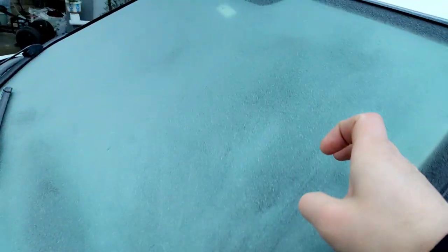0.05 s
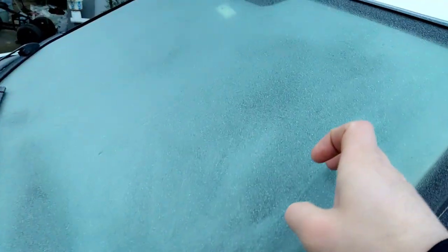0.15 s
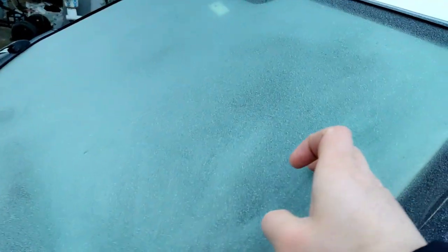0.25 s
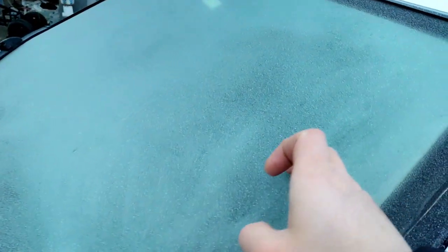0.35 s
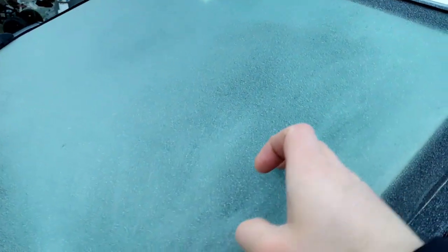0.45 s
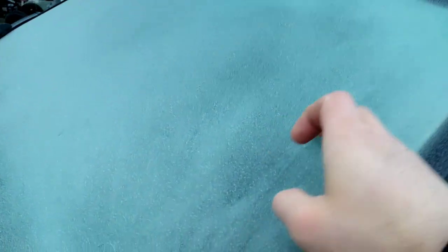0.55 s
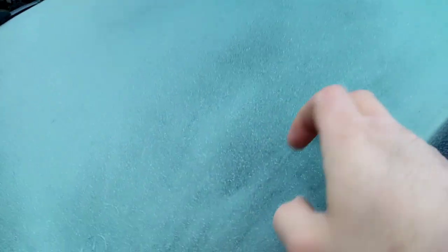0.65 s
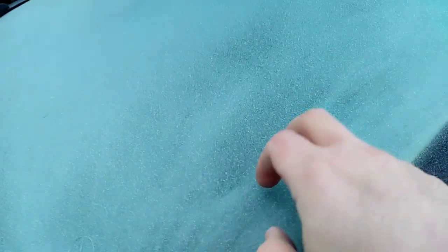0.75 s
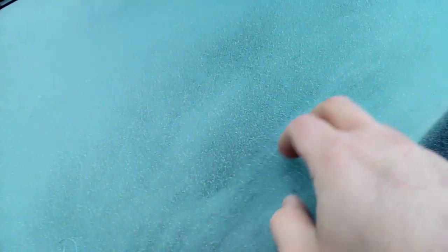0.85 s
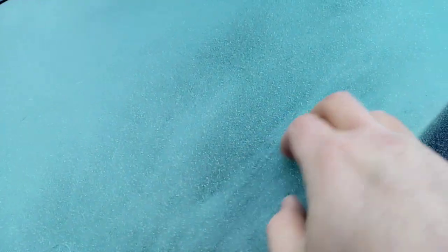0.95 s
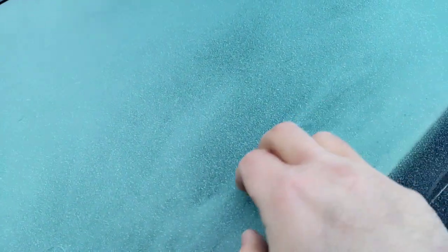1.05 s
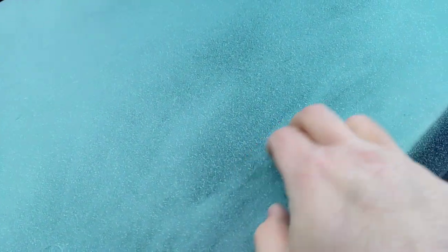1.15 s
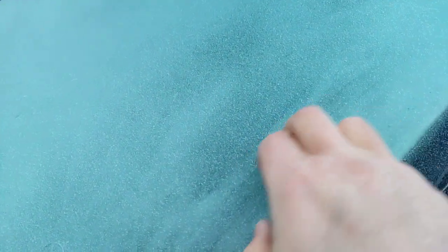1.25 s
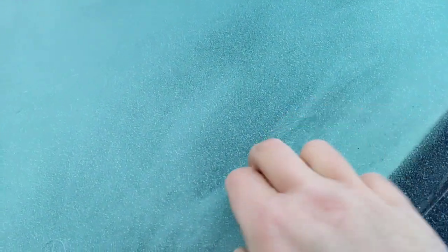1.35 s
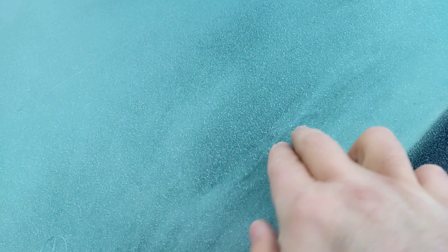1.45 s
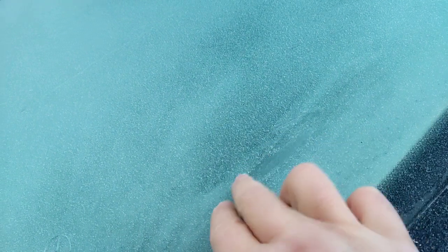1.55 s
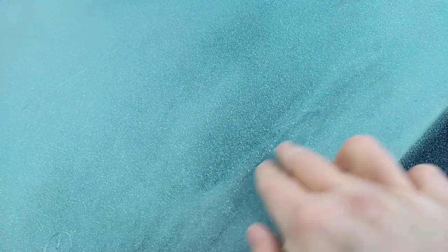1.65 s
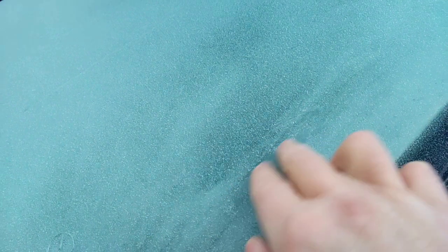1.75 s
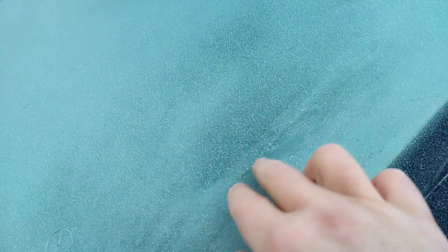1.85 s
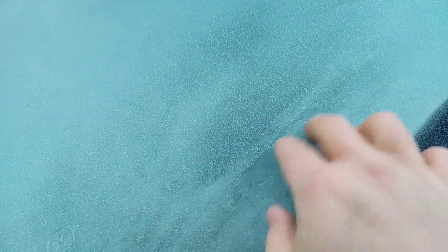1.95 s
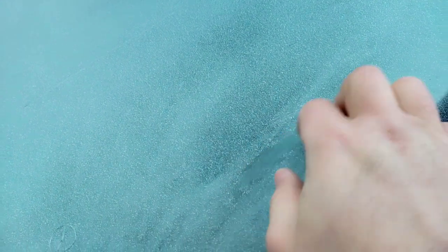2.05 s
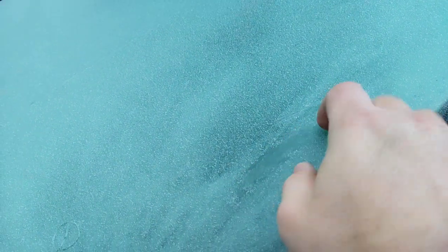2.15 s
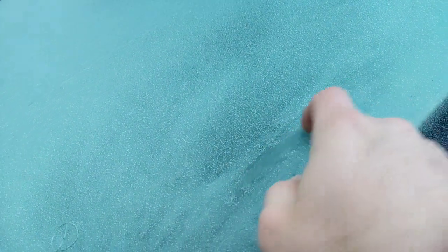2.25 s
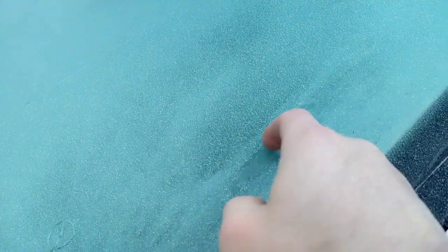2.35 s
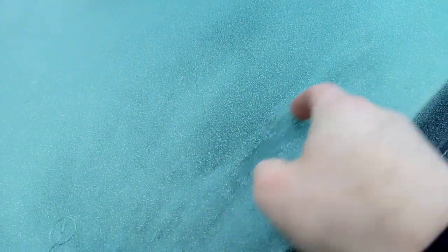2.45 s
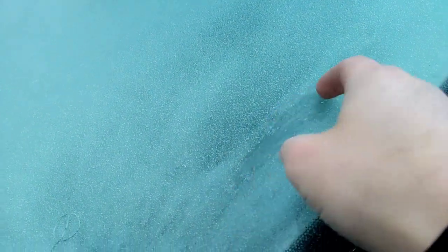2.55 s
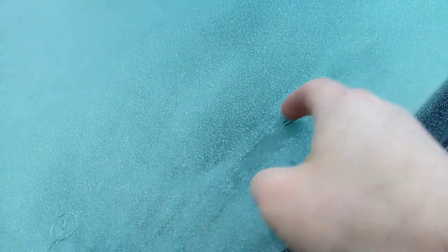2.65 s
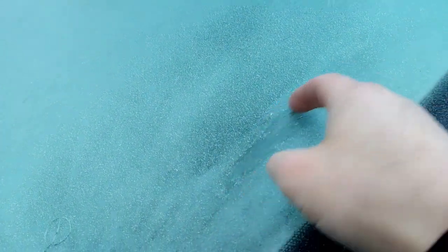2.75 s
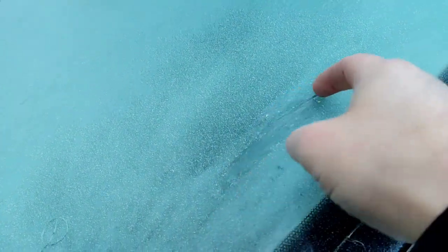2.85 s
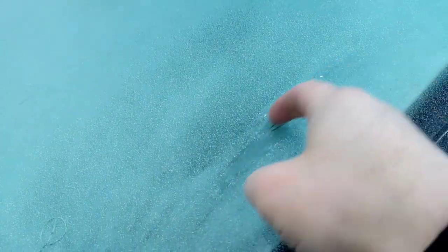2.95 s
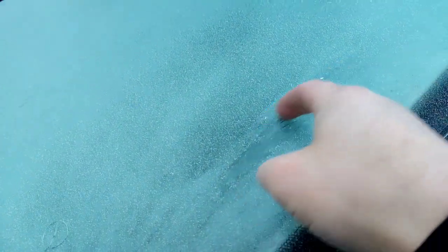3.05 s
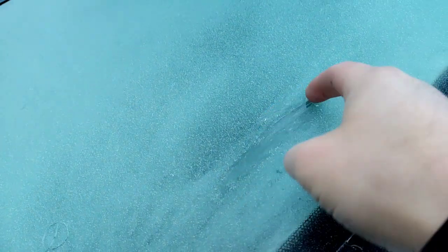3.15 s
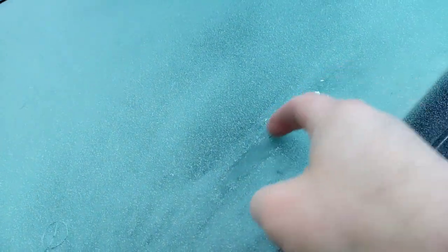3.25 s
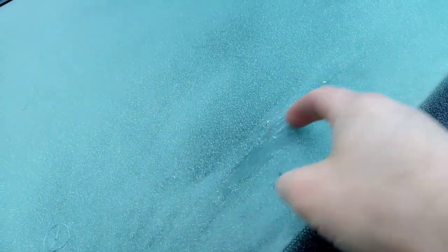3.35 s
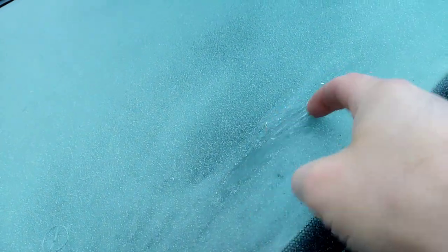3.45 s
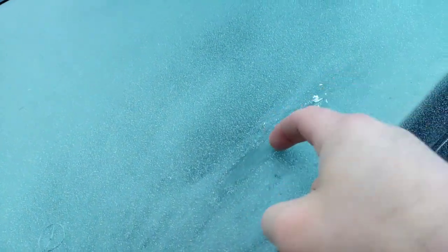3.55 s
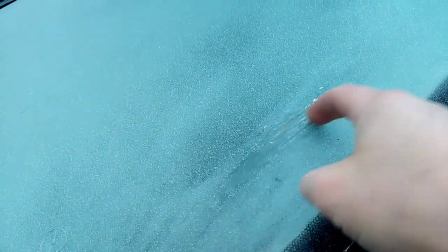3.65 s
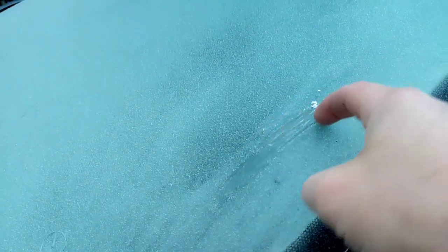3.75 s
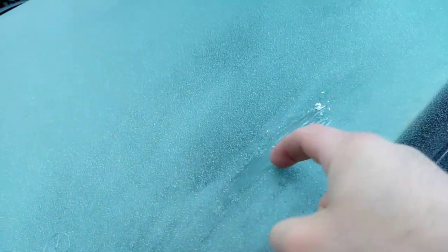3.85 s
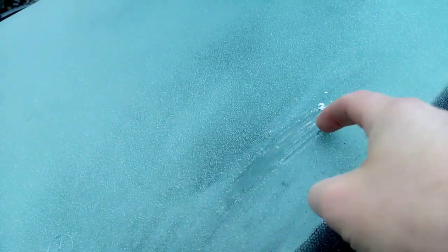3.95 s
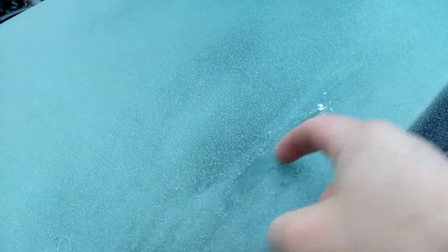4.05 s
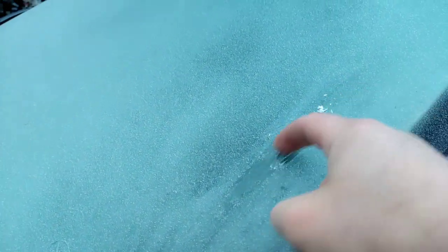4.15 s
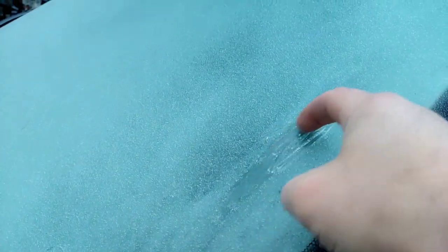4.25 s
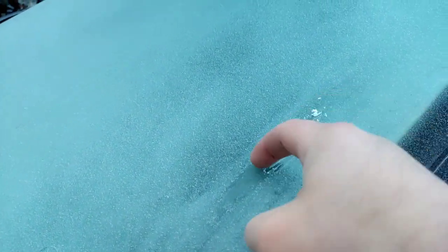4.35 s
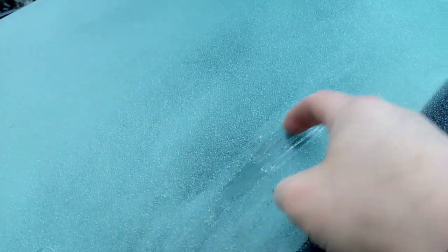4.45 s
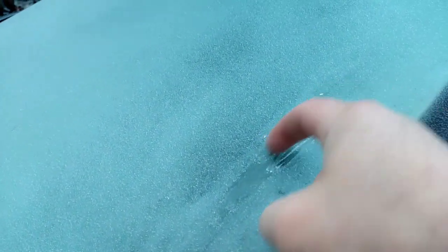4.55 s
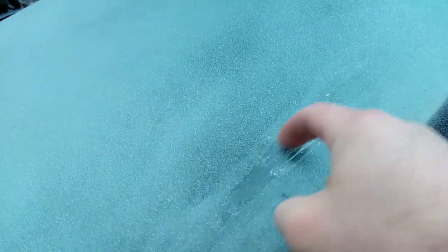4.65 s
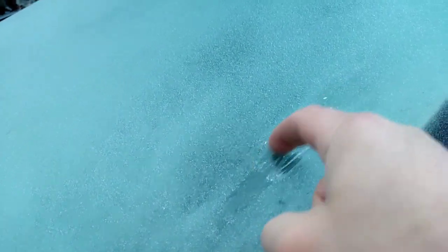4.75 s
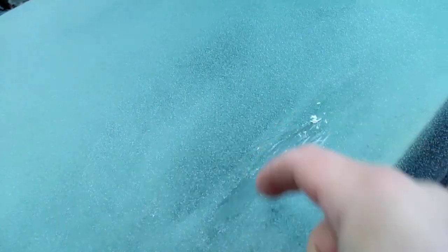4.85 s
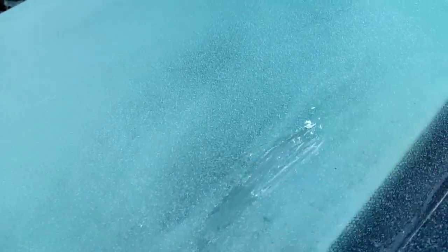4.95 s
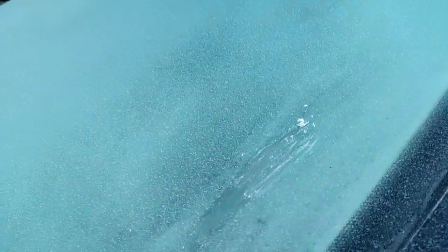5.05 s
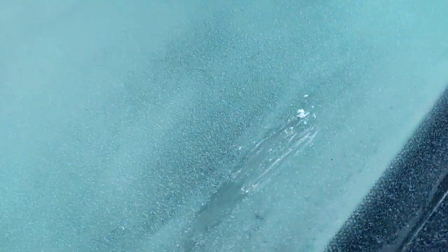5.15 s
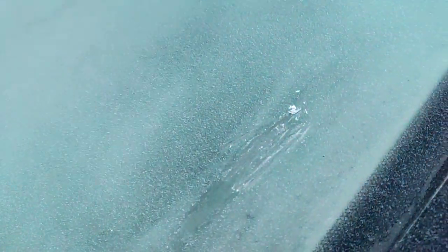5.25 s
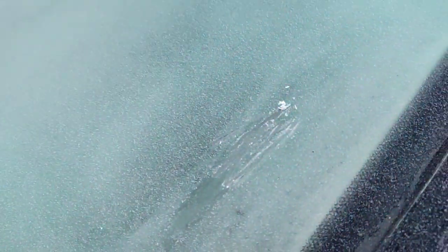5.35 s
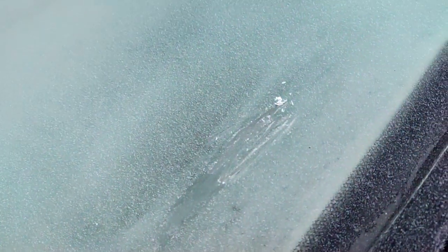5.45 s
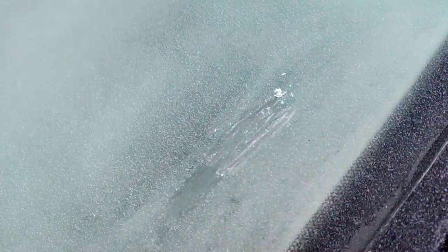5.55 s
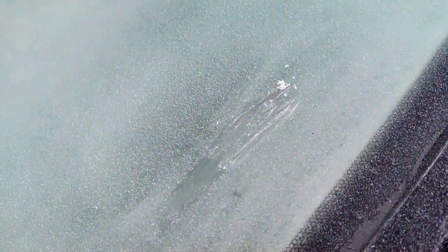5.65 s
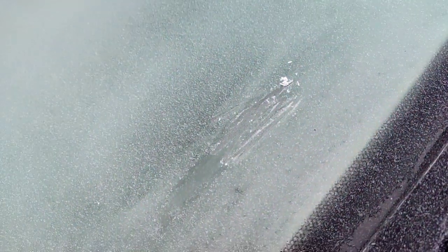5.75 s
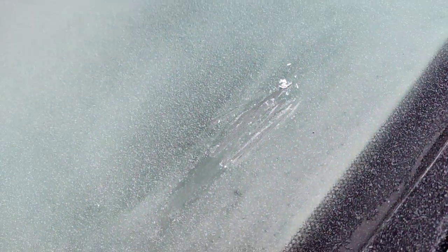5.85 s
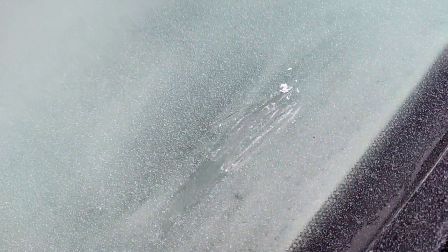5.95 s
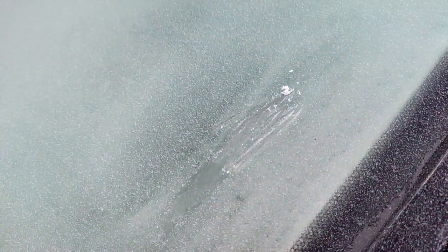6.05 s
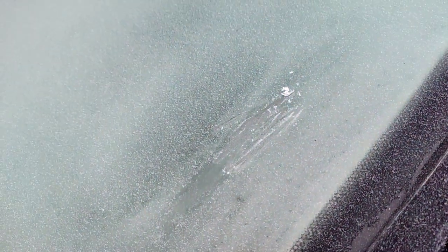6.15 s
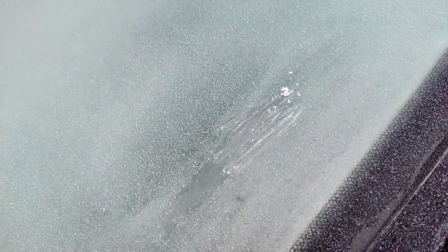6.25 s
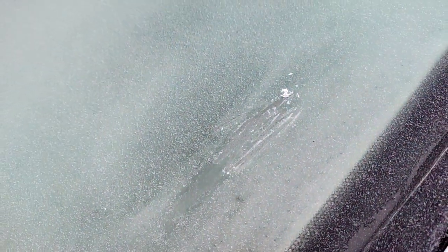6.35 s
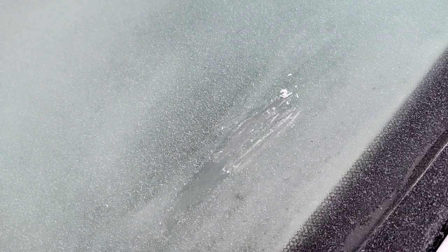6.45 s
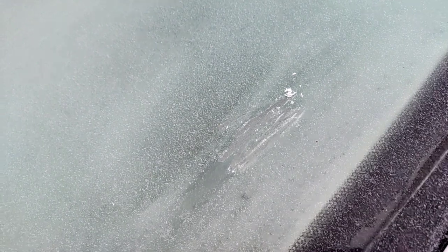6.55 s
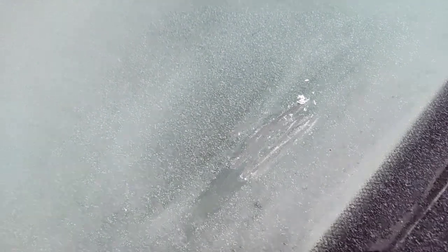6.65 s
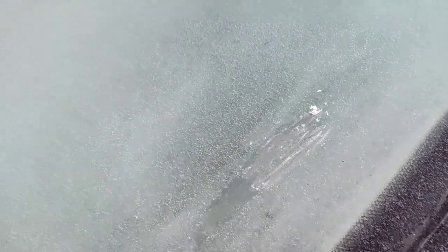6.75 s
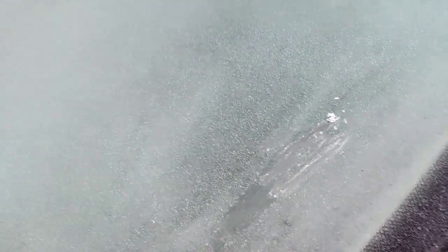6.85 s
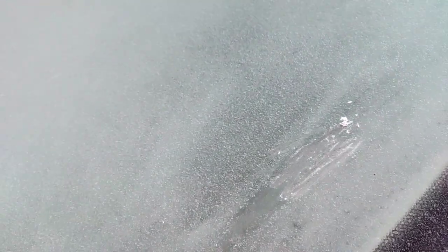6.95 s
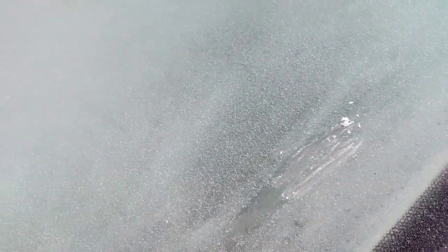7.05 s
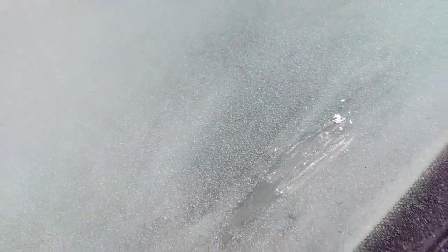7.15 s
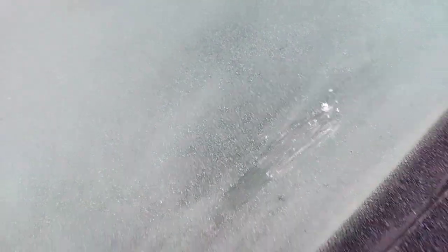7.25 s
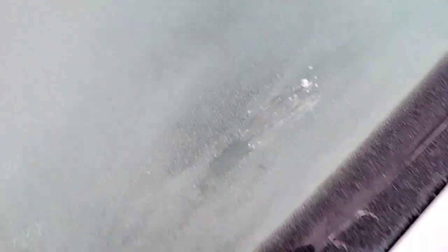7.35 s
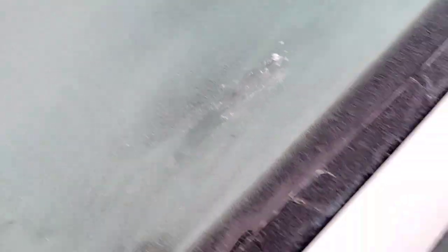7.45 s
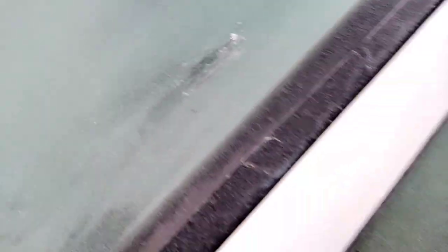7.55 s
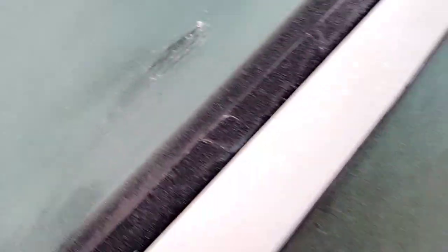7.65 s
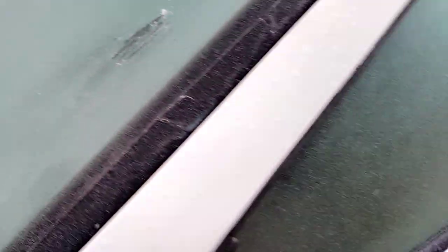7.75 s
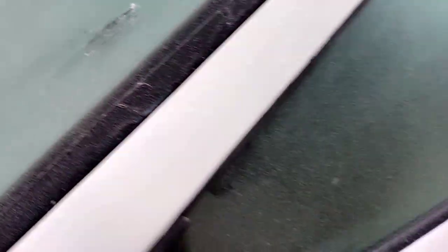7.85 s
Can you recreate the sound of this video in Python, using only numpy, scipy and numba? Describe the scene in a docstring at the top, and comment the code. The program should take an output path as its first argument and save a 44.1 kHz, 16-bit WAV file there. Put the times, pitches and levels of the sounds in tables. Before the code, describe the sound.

Close stereo phone pickup outdoors. A nylon sleeve swishes and shoes crunch on frozen ground, then fingernails rake windshield frost: six quick bright strokes, a short gap with a sleeve swish, then a longer steady run of gritty scrapes with duller glass chatter. The scraping weakens and stops; soft sleeve swishes remain, with one late thud. Wind bumps the microphone over a faint distant motor.

```python
"""Outdoors, a two-port phone is held close to a frosted car windscreen: a nylon sleeve swishes (fabric-coloured
grit) and shoes crunch on frozen ground (ringing grains over a thud). From 1.1 s fingernails scrape the frost in two
runs of quick strokes, bright ice grit over duller glass chatter, with soft thuds in the second. From 4.8 s the sleeve
swishes on alone and one late thud lands. Throughout, short decaying sines tick, wind buffets the ports (low noise and
single cycles), and a motor drones down the street (narrow noise bands), slowly drawing away."""
import sys
import numpy as np
from scipy import signal
from scipy.fft import rfft, irfft
from scipy.io import wavfile
from scipy.ndimage import uniform_filter1d
from numba import njit

SR = 44100
rng = np.random.default_rng(int(sys.argv[2]) if len(sys.argv) > 2 else 0)


def log_audio(samples):
    """Write samples as a 16-bit WAV file to the path given in sys.argv[1]."""
    # one column per channel
    frames = np.atleast_2d(samples).T
    # limit to full scale, then quantise
    limited = np.clip(frames, -1, 1)
    pcm = np.round(limited * 32767).astype(np.int16)
    wavfile.write(sys.argv[1], SR, pcm)


N = 348390

HAND_PAN_DB = -6  # left minus right, scraping hand
BITE_S_PER_DB, LIFT_S = 0.0008, 0.012  # a lighter landing bites slower
CRUMBS_DB, CRUMBS_FALL_DB_PER_S = -23.5, 140  # loose frost, relative to the stroke's peak
BRIGHT_PER_DB = -0.5  # brightness [dB] per pressure [dB]: lighter contact sounds brighter
NAIL_SHARE = 0.72  # glass chatter follows pressure less than the ice hiss does
ECHO_DEPTH, ECHO_SWEEP = 0.46, 0.06  # share removed at the notch; its slide along a stroke, as a fraction of Hz

# Scraping strokes: (start [s], length [s], ice hiss level [dB], nail-on-glass level [dB],
# place of the peak [0-1], brightness [dB], first contact under the peak [dB], last contact under the peak [dB])
STROKES = [(1.108, 0.13, -45.5, -61, 0.67, -5, 11, 17), (1.24, 0.16, -42, -55, 0.45, 0.5, 13.4, 14),
           (1.396, 0.11, -42, -59, 0.46, 1, 11, 4.3), (1.499, 0.13, -36, -53, 0.49, 1, 13, 13),
           (1.638, 0.12, -38, -55, 0.46, 2, 9.4, 11.5), (1.755, 0.12, -41.5, -55.5, 0.44, 2.5, 8.5, 13.5),
           (2.269, 0.12, -38.5, -49, 0.47, -3.5, 13, 10.5), (2.419, 0.186, -39, -50.5, 0.54, 1, 8.9, 19),
           (2.6, 0.13, -40.5, -48.5, 0.55, -2.5, 14, 18), (2.748, 0.16, -36.5, -49.5, 0.5, -0.5, 15.3, 21),
           (2.918, 0.12, -45.5, -53.5, 0.52, 0, 5.8, 18), (3.058, 0.13, -41.5, -53.5, 0.39, -1.5, 14, 9.6),
           (3.209, 0.13, -40, -50.5, 0.54, -3, 14, 19.5), (3.369, 0.11, -38, -52, 0.45, -5.5, 9.6, 21),
           (3.492, 0.11, -40.5, -50, 0.54, -2, 6.9, 9.2), (3.628, 0.118, -40, -54, 0.64, 0, 18, 21),
           (3.758, 0.12, -39, -49.5, 0.51, -5, 7.3, 6.9), (3.901, 0.134, -41, -50.5, 0.33, -2.5, 11.6, 18),
           (4.029, 0.12, -42, -50.5, 0.63, -5.5, 18, 20), (4.164, 0.14, -38.5, -54.5, 0.14, 3, 7, 11.5),
           (4.327, 0.094, -44, -58.5, 0.44, 2, 18, 20), (4.429, 0.12, -46.5, -56, 0.06, 0, 3.6, 7.5),
           (4.55, 0.14, -48.5, -59.5, 0.45, 3.5, 13, 16), (4.703, 0.11, -49, -60, 0.38, 5, 16, 8.5)]
# Breaking ice as it reaches each port, the left shaded by the phone's body:
# (frequency [Hz], left level [dB per Hz], right level [dB per Hz])
ICE_SPECTRA = [(2500, -20, -23), (3740, -8, -16), (4200, -12.5, -6), (5800, -10, -2.5), (6640, -8, -3.5),
               (9350, -0.5, -0.5), (10600, -5, -2.5), (11900, -4, -3), (13800, -8, -4.5)]
# The glass mirrors the nails: a notch at the right port that follows the hand: (time [s], frequency [Hz])
GLASS_ECHO = [(1.2, 12800), (2.0, 12100), (2.7, 10900), (4.2, 11200)]
# Glass resonances under the nails: (frequency [Hz], width [Hz], relative level [dB])
GLASS_MODES = [(316, 240, 6.5), (562, 330, 5), (910, 173, 10), (1414, 300, 8.5), (1857, 105, 9),
               (2300, 210, 2)]


def scratching(t):
    """Nails break ice crystals (bright grit) and chatter on the glass (duller ring), loudest at full pressure."""
    hiss_power, nail, bright_db, along = np.zeros((4, N))
    for start, length, ice_db, nail_db, peak, stroke_bright_db, first_db, last_db in STROKES:
        end, top = start + length, start + peak * length
        span, now = near(start, length + 0.5)
        bite = np.clip((now - start) / (BITE_S_PER_DB * max(first_db, 4)), 0, 1)
        contact = bite * np.clip((end - now) / LIFT_S, 0, 1)
        before_top = np.clip((top - now) / (top - start), 0, 1)
        after_top = np.clip((now - top) / (end - top), 0, 1)
        press_db = -first_db * before_top ** 1.4 - last_db * after_top ** 1.4
        # loose frost slides on after the nails lift
        crumbs = (now > top) * undb(CRUMBS_DB - CRUMBS_FALL_DB_PER_S * np.maximum(now - end, 0))
        hiss_power[span] += (undb(ice_db) * np.maximum(contact * undb(press_db), crumbs)) ** 2
        nail[span] += undb(nail_db + NAIL_SHARE * press_db) * contact
        bright_db[span] = stroke_bright_db + BRIGHT_PER_DB * (press_db + 6.5)
        along[span] = np.clip((now - start) / length, 0, 1)

    hz, *ports_db = np.transpose(ICE_SPECTRA)
    grains = pair(lambda: grit(18000, 1.0), 0.011)
    left, right = [colour(x, np.transpose([hz, db])) for x, db in zip(grains, ports_db)]
    notch_slide = 1 + ECHO_SWEEP * (along - 0.5) + 0.056 * walk(4.6)
    notch_hz = np.clip(np.interp(t, *np.transpose(GLASS_ECHO)) * notch_slide, 3000, 16000)
    right = right - ECHO_DEPTH * svf(right, notch_hz, 1500.0)
    ice = np.array([left, right])

    # coarse and fine crystals come in patches, so low and high grit swell apart
    coarse = np.array([svf(x, np.full(N, 5200.0), 2700.0) for x in ice])
    tilt_db = bright_db + 4.0 * walk(29.98)
    ice = coarse * undb(-tilt_db / 2) + (ice - coarse) * undb(tilt_db / 2)

    glass = pair(lambda: wander(grit(5000, 1.6), GLASS_MODES, drift=0.053, patchy_db=2.5, rate=24), 0.35)
    glass = glass * undb(1.5 * walk(70))
    catch = undb(0.86 * walk(120) + 0.32 * walk(25.03))  # the nails slip and catch on uneven frost
    ice = np.outer(pan(HAND_PAN_DB), np.sqrt(hiss_power)) * ice
    glass = np.outer(pan(0.51 * HAND_PAN_DB), nail) * glass
    return catch * (ice + glass)


SWELL_POWER = 1.33  # higher: a swish rises later and falls earlier
SHADE_HZ = 9300  # the phone's body shades the right port from the sleeve's top

# Sleeve swishes: (start [s], rise [s], hold [s], fall [s], level [dB], left minus right [dB])
SWISHES = [(-0.1, 0.12, 0.02, 0.14, -44.5, -3), (0.116, 0.022, 0.014, 0.049, -40.5, -3),
           (0.153, 0.15, 0.079, 0.079, -42.5, -5.5), (0.491, 0.031, 0.061, 0.44, -45.5, -5),
           (0.812, 0.065, 0.031, 0.082, -49.5, -6), (0.964, 0.047, 0.036, 0.14, -43, -6),
           (1.893, 0.05, 0.099, 0.3, -43, -2), (4.35, 0.24, 0.086, 0.1, -56, -9),
           (4.787, 0.027, 0.071, 0.56, -45, -5.5), (4.82, 0.15, 0.045, 0.36, -43.5, 0.5),
           (5.083, 0.13, 0.23, 0.22, -44.5, -1), (5.95, 0.066, 0.045, 0.1, -58, -7),
           (6.077, 0.065, 0.29, 0.29, -47.5, 2), (6.305, 0.21, 0.25, 0.19, -51, -2.5),
           (6.94, 0.4, 0.25, 0.14, -42.5, -1), (7.69, 0.12, 0.085, 0.19, -46, -6)]
# Nylon rubbing on nylon: (frequency [Hz], level [dB per Hz])
NYLON_SPECTRUM = [(300, -14), (1000, -5.5), (2000, -10), (3200, -12), (6000, -3.5), (9000, 4), (12000, -1),
                  (15000, -8)]


def sleeve(t):
    """Fabric slides on fabric: fine dense friction that swells with the arm's movement."""
    power = np.zeros((2, N))
    for start, rise, hold, fall, db, pan_db in SWISHES:
        end = start + rise + hold + fall
        speed = np.clip(np.minimum((t - start) / rise, (end - t) / fall), 0, 1)
        power += np.outer(pan(pan_db), undb(db) * speed ** SWELL_POWER) ** 2
    swell = uniform_filter1d(np.sqrt(power), size=600)
    left, right = pair(lambda: colour(grit(25000, 0.63), NYLON_SPECTRUM), 0.016)
    shade = signal.butter(2, SHADE_HZ, fs=SR, output="sos")
    cloth = np.array([left, signal.sosfilt(shade, right)])
    rustle = undb(0.9 * walk(30) + 1.1 * walk(9))
    return swell * rustle * cloth


# Steps and shifts of weight:
# (time [s], crunch level [dB], length [s], thud level [dB], crunch left minus right [dB], attack [s])
STEPS = [(0.126, -43, 0.037, -50, -4, 0.0013), (0.148, -46, 0.018, -51, -3, 0.011),
         (0.604, -46, 0.14, -61, 1, 0.023), (0.976, -39.5, 0.14, -45.5, 0, 0.0035),
         (3.55, -62, 0.046, -48, 1.5, 0.0095), (3.791, -62, 0.091, -48, -2, 0.0095),
         (4.443, -62, 0.092, -47, 5, 0.0026), (4.756, -59, 0.028, -45.5, 3, .004),
         (6.276, -69, 0.13, -52, -3, 0.003)]
# Frozen grit under the sole: (frequency [Hz], width [Hz], relative level [dB])
GROUND_MODES = [(600, 1500, 2), (1520, 190, 5.5), (1880, 310, 4), (3320, 700, -6), (11000, 8000, -18)]


def steps(t):
    """Each step crushes frozen grit under the sole and thuds dully through the ground."""
    crunch, thud = np.zeros((2, N)), np.zeros(N)
    for start, crunch_db, length, thud_db, pan_db, attack in STEPS:
        age = np.maximum(t - start, 0)
        shape = np.minimum(age / attack, 1) * np.exp(-(age / length) ** 1.39)
        crunch += np.outer(pan(pan_db), undb(crunch_db) * shape)
        thud += undb(thud_db) * shape
    grains = pair(lambda: wander(grit(7000, 1.1), GROUND_MODES, drift=0.047, patchy_db=3.5, rate=50), 0.28)
    grains = grains * undb(1.1 * walk(81.3))
    thud_modes = [(137, 115, 20.0), (224, 110, 13), (416, 130, -10.0), (690, 140, -25)]  # (Hz, width Hz, dB)
    body = level(ring(grit(900, 0.61), thud_modes), 0)
    return crunch * grains + thud * body


# Single ticks and knocks: (time [s], starting level [dB], pitch [Hz], ring time to -60 dB [s])
TICKS = [(.128, -29.5, 9100, 0.0065), (.129, -32, 1650, 0.013), (.131, -29, 450, 0.015),
         (.157, -27.5, 890, 0.01), (.208, -36, 1300, 0.009), (.206, -37.5, 4300, 0.004),
         (.207, -38, 8200, 0.0055), (0.479, -42, 1570, 0.012), (1.058, -30, 1740, .02),
         (2.615, -39, 1565, 0.044), (3.766, -30, 12500, 0.003), (4.441, -41, 1500, .012),
         (4.454, -40, 1070, .014), (4.504, -43, 1390, .012), (4.766, -44, 596, 0.03),
         (4.899, -30.5, 800, 0.0048), (4.768, -43, 390, .04), (6.272, -35.5, 148, 0.11),
         (6.273, -48, 670, .05), (6.282, -40.5, 470, 0.07), (6.29, -43.5, 278, .08)]


def ticks(t):
    """Short sines that start within one cycle and die away exponentially, alike at both ports."""
    out = np.zeros(N)
    for start, db, hz, t60 in TICKS:
        span, now = near(start, t60)
        age = np.maximum(now - start, 0)
        onset = np.sin(np.pi / 2 * np.minimum(age * hz, 1)) ** 2
        out[span] += undb(db - 60 * age / t60) * onset * np.sin(2 * np.pi * hz * age)
    return out


# Breeze at each port: (time [s], left level [dB], right level [dB])
BREEZE = [(0, -53, -50.5), (0.7, -48, -47), (1.3, -51.5, -51), (1.8, -49.5, -52), (2.3, -55, -45.5),
          (2.699, -48.5, -49.5), (3.6, -55.5, -55), (3.9, -43, -43), (4.4, -52, -49), (5.2, -52.5, -48),
          (5.8, -54.5, -50.5), (6.2, -57, -50.5), (6.5, -54.5, -49), (7.1, -53, -54), (7.9, -49, -52)]
# Gusts that strike one port: (middle [s], length [s], level [dB], port [0 left, 1 right])
GUSTS = [(0.18, 0.19, -44.5, 1), (0.426, 0.12, -44, 1), (0.77, 0.21, -38.5, 1), (0.955, 0.11, -48, 0),
         (1.066, 0.15, -45, 0), (1.179, 0.087, -42, 1), (1.219, 0.066, -43, 0), (1.418, 0.057, -46.5, 1),
         (1.602, 0.15, -46, 1), (2.029, 0.15, -35, 1), (2.316, 0.17, -40.5, 1), (2.458, 0.062, -42, 1),
         (2.802, 0.057, -44, 0), (2.918, 0.18, -35.5, 1), (3.03, 0.067, -47, 1), (3.199, 0.16, -39, 1),
         (3.29, 0.066, -46.5, 0), (3.367, 0.079, -42, 1), (3.515, 0.13, -41.5, 1), (3.68, 0.062, -46, 0),
         (3.717, 0.1, -40.5, 1), (4.13, 0.2, -40, 1), (4.251, 0.067, -37.5, 1), (4.47, 0.15, -47, 0),
         (4.475, 0.087, -37, 1), (4.648, 0.087, -41, 1), (4.784, 0.14, -39, 1), (4.901, 0.078, -43.5, 1),
         (5.017, 0.082, -42, 1), (5.057, 0.19, -47, 0), (5.378, 0.099, -45, 1), (5.56, 0.1, -45, 1),
         (5.922, 0.11, -48.5, 1), (6.307, 0.077, -46.5, 0), (6.316, 0.081, -45.5, 1),
         (6.776, 0.055, -50, 1), (0.607, 0.054, -48, 1)]


def wind(t):
    """Eddies push each port on its own; stronger gusts carry smaller, higher eddies."""
    time, left_db, right_db = np.transpose(BREEZE)
    power = undb([np.interp(t, time, left_db), np.interp(t, time, right_db)]) ** 2
    for middle, length, db, port in GUSTS:
        span, now = near(middle - length, 2 * length)
        power[int(port), span] += undb(db) ** 2 * np.exp(-(2 * (now - middle) / length) ** 4)
    out = []
    for port_db in 10 * np.log10(power):
        hz = np.clip(150 * undb(0.63 * (port_db + 45.0)), 70, 380)
        turbulence = rng.standard_normal(N) * undb(2.0 * walk(30))
        eddies = dull(dull(turbulence, hz), 1.29 * hz) * np.sqrt(hz)
        eddies = svf(eddies, np.full(N, 45.0), 284.0)  # the port passes no steady pressure
        out.append(level(eddies, 0.34) * undb(port_db + 1.86 * walk(7.6)))
    return np.array(out)


# Single wind pops: (time [s], level [dB], length [s], port [0 left, 1 right], first swing [1 push, -1 suck])
POPS = [(0.725, -29, 0.015, 1, -1), (0.75, -28.5, 0.024, 1, 1), (0.892, -27, 0.027, 0, -1),
        (1.966, -27, 0.011, 1, 1), (1.977, -27, 0.023, 1, -1), (2.046, -21, 0.011, 1, -1),
        (2.059, -24, .02, 1, -1), (2.296, -24.5, 0.016, 1, 1), (2.837, -26.5, 0.018, 1, 1),
        (2.86, -19, 0.019, 1, -1), (2.913, -24, 0.024, 1, 1), (4.081, -27.5, 0.014, 1, -1),
        (4.262, -19, 0.015, 1, -1), (4.637, -26.5, 0.037, 1, -1), (4.791, -23, 0.014, 1, 1),
        (4.89, -24, 0.018, 1, -1), (5.016, -26.5, 0.013, 1, -1)]


def pops(t):
    """One eddy pushes or sucks at a port and lets go: a single rounded cycle."""
    out = np.zeros((2, N))
    for start, db, length, port, swing in POPS:
        span, now = near(start, length)
        way = np.clip((now - start) / length, 0, 1)
        out[int(port), span] += swing * undb(db) * np.sin(2 * np.pi * way) * np.sin(np.pi * way)
    return out


DRONE_FADE_DB_PER_S = 0.48
STREET_DB = -59  # distant noise, wavering about this level

# Motor down the street: (frequency [Hz], width [Hz], level before wavering and fading [dB])
DRONE_BANDS = [(150.3, 15, -63), (296.7, 12.7, -66.5), (489, 13, -76), (654, 24, -73)]
# Soft distant noise: (frequency [Hz], level [dB per Hz])
STREET_SPECTRUM = [(60, -40), (200, -0.5), (400, -6.5), (1000, -8.5), (2500, -12.5), (5000, -13.5),
                   (9000, -10.5), (15000, -19.5)]


def street():
    """A wavering motor drone, alike at both ports, over soft distant noise."""
    drone = np.zeros(N)
    for hz, width, db in DRONE_BANDS:
        band = svf(rng.standard_normal(N), hz * (1 + 0.0079 * walk(2.39)), 1.0 * width)
        drone += level(band, db) * undb(2.17 * walk(3.02))
    drone = drone * undb(-DRONE_FADE_DB_PER_S * (np.arange(N) / SR - 3.5))  # it draws away
    air = pair(lambda: colour(rng.standard_normal(N), STREET_SPECTRUM), 0.1)
    return drone + undb(STREET_DB + 0.5 * walk(1.88)) * air


def undb(db):
    """Decibels to gain."""
    return 10 ** (np.asarray(db) / 20)


def level(x, db):
    """Scale to an rms level."""
    return x * undb(db) / np.sqrt(np.mean(x ** 2))


def pan(db):
    """Left and right gains for a left-minus-right level."""
    return undb(np.array([db / 2, -db / 2]))


def near(start, length):
    """The samples of one event, and their times."""
    span = slice(int(max(start, 0) * SR), min(int((start + length) * SR), N))
    return span, np.arange(span.start, span.stop) / SR


def walk(rate):
    """Random levels held 1 / rate s and slewed twice; spread near 1."""
    hold = int(SR / rate)
    held = np.repeat(rng.standard_normal(N // hold + 1), hold)
    return 1.35 * uniform_filter1d(uniform_filter1d(held, hold), hold)[:N]


def grit(per_s, spread_db):
    """Tiny random clicks of uneven but bounded size, rms 1."""
    hit = rng.random(N) < per_s / SR
    size = np.minimum(rng.exponential(size=N), 3)
    return level(hit * rng.standard_normal(N) * undb(spread_db * size), 0)


def pair(make, shared):
    """Two channels with a share of the same sound's power."""
    both = make()
    return np.array([np.sqrt(shared) * both + np.sqrt(1 - shared) * make() for _ in range(2)])


def colour(x, points):
    """Shape by a (Hz, dB) spectrum, falling away below its first point; rms 1."""
    hz, db = np.transpose(points)
    f = np.maximum(np.fft.rfftfreq(N, 1 / SR), 1)
    gain = undb(np.interp(np.log(f), np.log(hz), db)) * np.minimum(f / hz[0], 1) ** 2
    return level(irfft(rfft(x) * gain, N), 0)


@njit
def svf(x, hz, width):
    """State-variable band-pass with a centre that may move, gain 1 at the centre."""
    y, band, low = np.empty(len(x)), 0., 0.
    for i in range(len(x)):
        g, k = np.tan(np.pi * hz[i] / SR), width / hz[i]
        v = (band + g * (x[i] - low)) / (1 + g * (g + k))
        band, low, y[i] = 2 * v - band, low + 2 * g * v, k * v
    return y


@njit
def dull(x, hz):
    """Four one-pole low-passes in a row with a moving corner, divided by the root of their step size."""
    y, state = np.empty(len(x)), np.zeros(4)
    for i in range(len(x)):
        a, v = 2 * np.pi * hz[i] / SR, x[i]
        for k in range(4):
            state[k] += a * (v - state[k])
            v = state[k]
        y[i] = v / np.sqrt(a)
    return y


def ring(x, modes):
    """Sum of (Hz, width Hz, dB) resonances."""
    return sum(undb(db) * svf(x, np.full(N, 1.0 * hz), 1.0 * width) for hz, width, db in modes)


def wander(x, modes, drift, patchy_db, rate):
    """Resonances that slide and swell one by one as the point of contact moves; rms 1."""
    out = np.zeros(N)
    for hz, width, db in modes:
        swell = undb(db + patchy_db * walk(rate))
        out += swell * svf(x, hz * (1 + drift * walk(rate / 2)), 1.0 * width)
    return level(out, 0)


def scene():
    """All sources at the two ports."""
    t = np.arange(N) / SR
    return scratching(t) + sleeve(t) + steps(t) + ticks(t) + wind(t) + pops(t) + street()


TOP_HZ = 14230

# Resonance added at the left, then the right microphone port:
# (frequency [Hz], width [Hz], level of the added band [dB])
PORT_MODES = [(10200, 1620, 4), (7910, 850, 2.5)]


def record(dry):
    """Each port lifts the treble at its own resonance; the top is cut steeply."""
    lifted = [x + ring(x, [mode]) for x, mode in zip(dry, PORT_MODES)]
    top_cut = signal.ellip(14, 0.3, 60, TOP_HZ, fs=SR, output="sos")
    return signal.sosfilt(top_cut, lifted)


dry = scene()
out = record(dry)
log_audio(out)
```